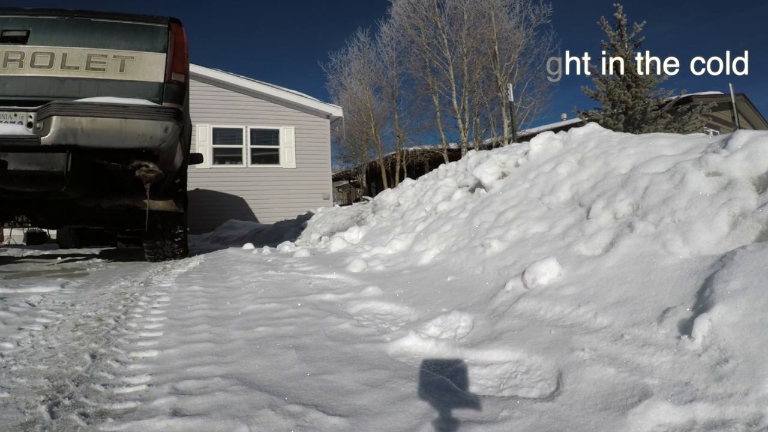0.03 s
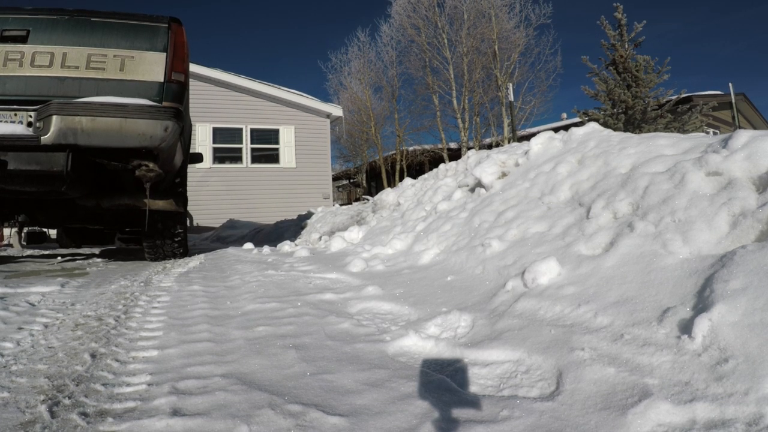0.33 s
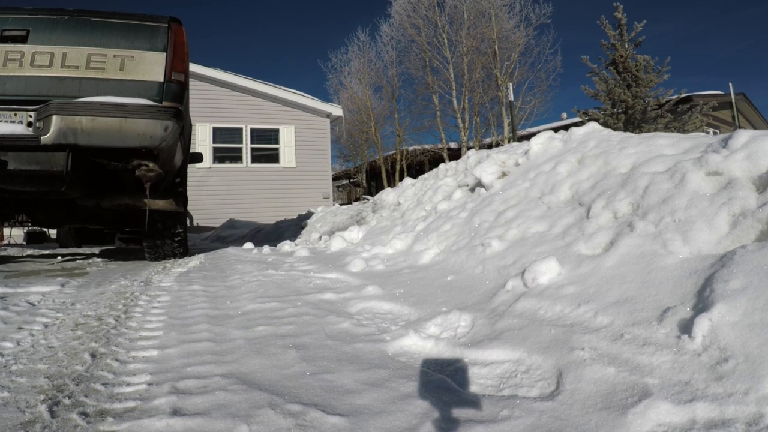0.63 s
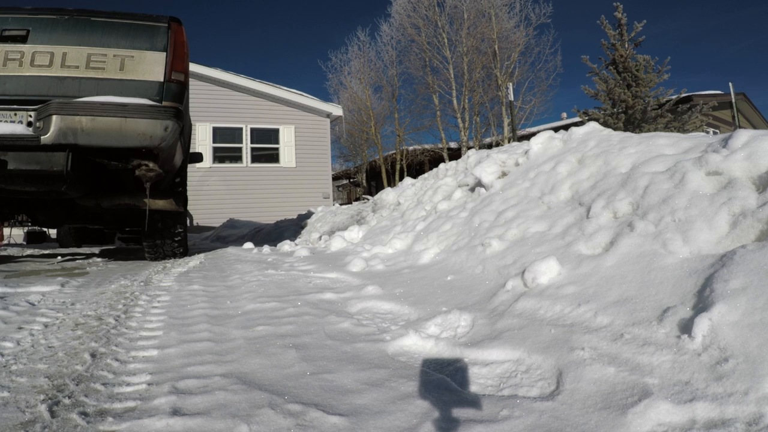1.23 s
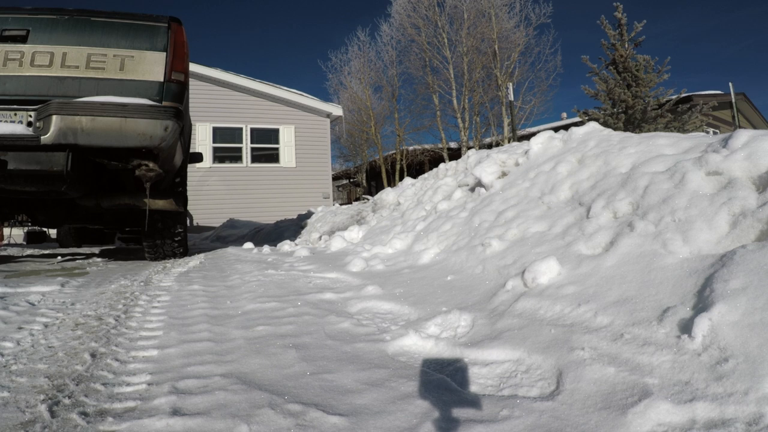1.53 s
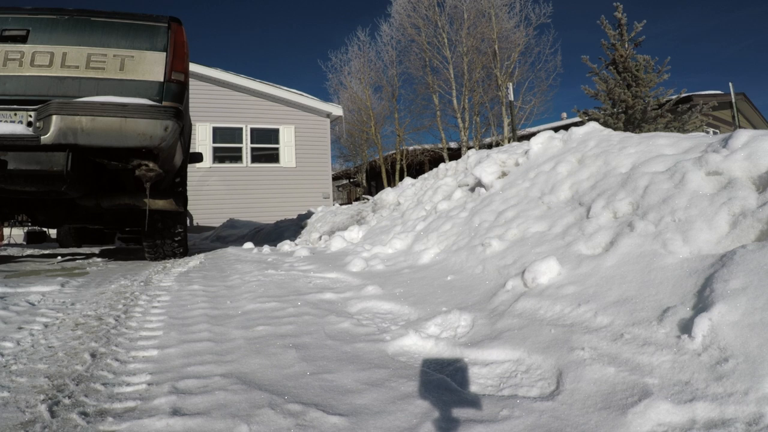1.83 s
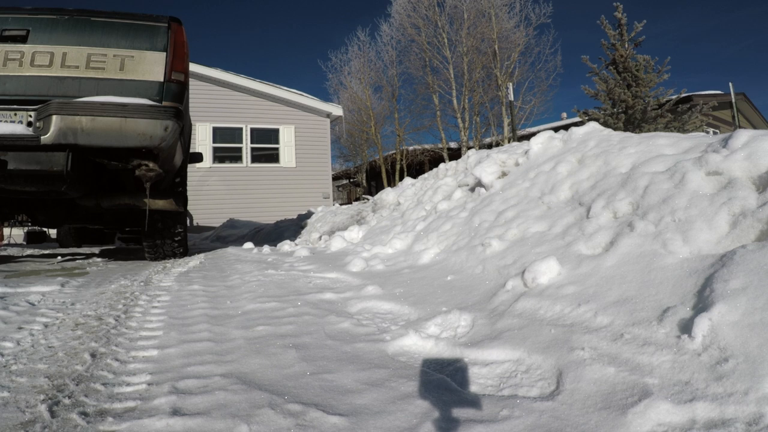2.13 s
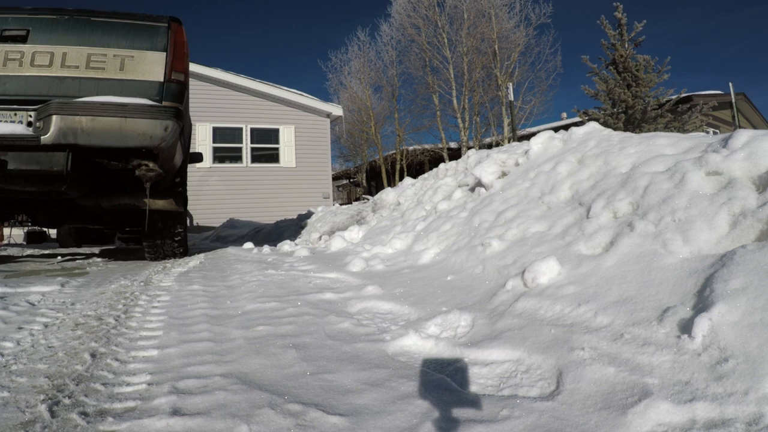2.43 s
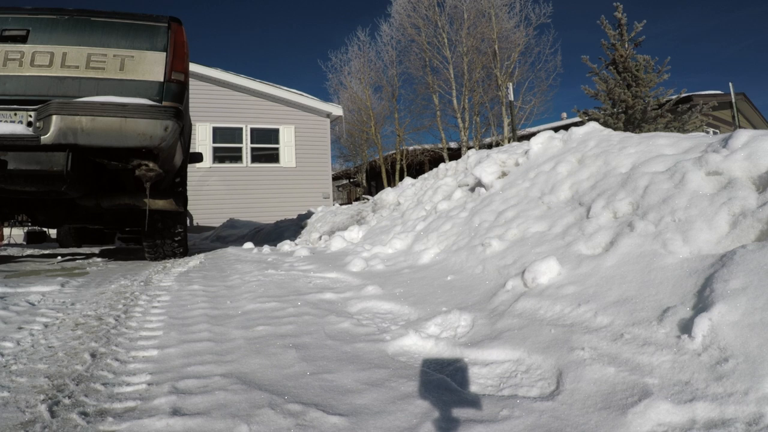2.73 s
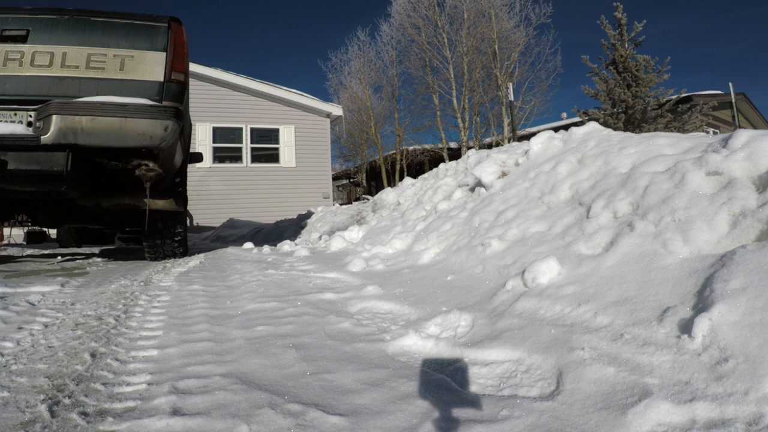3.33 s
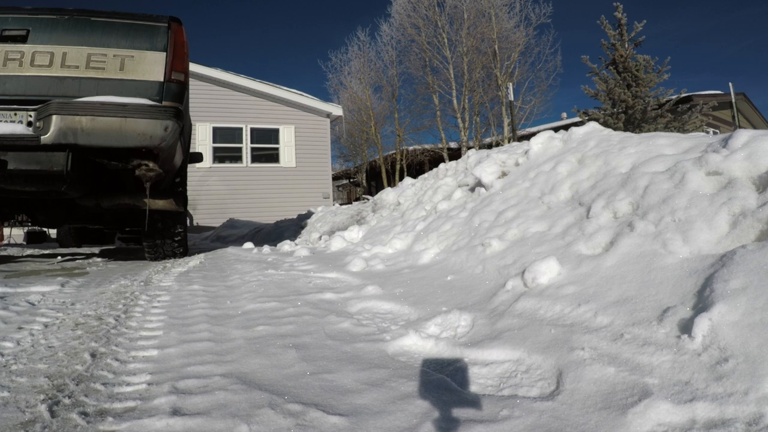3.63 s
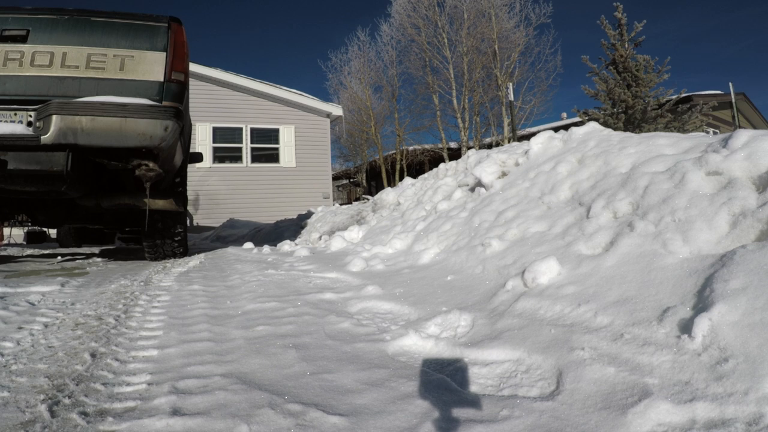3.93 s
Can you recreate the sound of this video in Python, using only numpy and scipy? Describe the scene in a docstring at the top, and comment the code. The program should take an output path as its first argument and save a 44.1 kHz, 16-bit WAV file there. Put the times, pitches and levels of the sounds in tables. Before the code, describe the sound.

A cold diesel truck cranks a few metres to the left outdoors. After a few microphone knocks and a quiet pause, the starter engages with a clank and squeak, whining and grinding in quickening pulses without the engine catching.

```python
"""A cold diesel pickup is cranked in a quiet, snowy driveway, a few metres from a small camera.
Over far rumble and steady hiss the camera is bumped; at 2 s comes one faint chink. At 2.86 s the solenoid
throws the starter pinion into the flywheel with a clash and a squeak. The gear whine sags and swells on
each compression stroke, and the unloaded gears rattle as the engine springs forward again.
Just before 4 s the engine gives one low thud."""
import sys
import numpy as np
from scipy import signal
from scipy.fft import rfft, irfft
from scipy.io import wavfile

SR = 44100
rng = np.random.default_rng(int(sys.argv[2]) if len(sys.argv) > 2 else 0)


def store_pcm(level_fs):
    """Save levels as 16-bit WAV."""
    pcm = np.round(np.clip(level_fs, -1, 1) * 32767).astype(np.int16)
    wavfile.write(sys.argv[1], SR, np.atleast_2d(pcm).T)


N = 176400


def amp(db):
    """Decibels to gain."""
    return 10 ** (np.asarray(db) / 20)


def unit(x):
    """Scale to rms 1."""
    return x / np.sqrt(np.mean(x ** 2))


def bins():
    """Bin frequencies in Hz, floored at 1."""
    return np.maximum(np.arange(N // 2 + 1) * SR / N, 1)


def curve(points):
    """Join (Hz, value) points on a log-frequency axis."""
    hz, value = np.array(points, float).T
    return np.interp(np.log(bins()), np.log(hz), value)


def shape(x, gain):
    """Filter by a gain per bin."""
    return irfft(rfft(x) * gain, N)


def ringing(peaks):
    """Response of a direct path plus resonances."""
    f = bins()
    return 1 + sum(amp(db) / (1 + 1j * (f * f - hz * hz) / (f * width)) for hz, width, db in peaks)


def ring_on(x, peaks):
    """Convolve with 0.25 s of resonant response."""
    return signal.fftconvolve(x, irfft(ringing(peaks), N)[:SR // 4])[:N]


def low_cut(x, hz=130):
    """Sixth-order high-pass."""
    return signal.sosfilt(signal.butter(6, hz, "high", fs=SR, output="sos"), x)


def noise(coherence):
    """Stereo noise with a left-right coherence per band."""
    c = np.clip(curve(coherence), -.99, .99)
    mid, side = shape(rng.standard_normal((2, N)), np.sqrt([1 + c, 1 - c]))
    return unit(np.array([mid + side, mid - side]))


def coloured(spectrum, coherence):
    """Shaped stereo noise, rms 1."""
    return unit(shape(noise(coherence), amp(curve(spectrum))))


def walk(rate_hz):
    """Smooth random wander, rms 1."""
    return unit(shape(rng.standard_normal(N), 1 / (1 + (bins() / rate_hz) ** 2) ** 2))


def burst(t, start_s, attack_s, decay_s):
    """Linear attack, exponential release."""
    age = t - start_s
    return np.clip(age / attack_s, 0, 1) * np.exp(-np.maximum(age - attack_s, 0) / decay_s)


def strike(t, start_s, modes, attack_s, pitch=1):
    """Decaying modes set off by one blow."""
    age = np.maximum(t - start_s, 0)
    ring = sum(amp(db - 60 * age / t60) * np.sin(2 * np.pi * hz * pitch * age) for hz, db, t60 in modes)
    return ring * np.clip(age / attack_s, 0, 1)


# background spectra (frequency [Hz], level [dB])
FAR_SPECTRUM = [(25, -48), (60, -25), (95, -96), (120, -19.5), (150, -5), (200, -0.5), (260, -7.5),
                (350, -8.5), (500, -13.5), (1000, -22), (5000, -42.5)]
HISS_SPECTRUM = [(300, -7), (1000, 3.5), (2000, 0.5), (3500, -3.5), (5500, -6), (7000, -2), (8200, -5.5),
                 (9800, -4), (11500, -12), (13000, -12), (15000, -71)]
# left-right likeness (frequency [Hz], coherence [ratio])
FAR_COHERENCE = [(100, 0.37), (250, 0.17), (600, 0.057), (1500, 0.039)]
HISS_COHERENCE = [(500, 0), (4000, 0)]
def outdoors(left_lag_s=0.00024):
    """Steady hiss; a far rumble from the right reaches the left port later."""
    delay = np.exp(-2j * np.pi * bins() * np.array([[left_lag_s], [0]]))
    far = shape(coloured(FAR_SPECTRUM, FAR_COHERENCE), delay)
    return amp(-40) * far + amp(-46) * coloured(HISS_SPECTRUM, HISS_COHERENCE)


# knocks on the camera (time [s], level [dB], tick level [dB], pitch [ratio])
KNOCKS = [(.025, -27.5, -75, 0.81), (0.137, -18, -60, 0.93), (.152, -20, -58, 1.07),
          (.167, -20, -34.5, 0.76), (.178, -21.5, -43, 1.2), (0.3947, -14, -29, 1.04),
          (.407, -17, -30.5, 0.94), (.425, -23, -38, 1.09), (0.684, -27.5, -75, 1.03),
          (0.699, -28, -75, 1.07)]
# camera and stand modes (frequency [Hz], level [dB], t60 [s])
MOUNT_MODES = [(170, -27, 0.037), (257, 4, 0.035), (385, -13, 0.019), (483, -11, 0.048)]
# case clicks (time [s], level [dB])
CASE_CLICKS = [(.13, -26), (.1675, -26.5), (.3949, -18.5)]
# stand shudders (time [s], level [dB], decay [s])
STAND_SHUDDERS = [(.16, -44, 0.033), (.395, -35, 0.066)]
# bump spectra (frequency [Hz], level [dB])
TICK_SPECTRUM = [(600, 2.5), (1500, -7.5), (4500, -12.5), (7000, -25), (15000, -34)]
SCUFF_SPECTRUM = [(200, -21), (400, -3), (570, 2), (800, -19), (5000, -47)]
SHUDDER_SPECTRUM = [(25, -3), (55, 2), (130, -13), (1000, -80)]
def camera_bumps(t):
    """Soft knocks with contact ticks and a scuff; the case clicks, the stand shudders."""
    knocks = sum(amp(db) * strike(t, s, MOUNT_MODES, .002, pitch) for s, db, _, pitch in KNOCKS)
    ticks = coloured(TICK_SPECTRUM, FAR_COHERENCE)
    ticks *= sum(amp(db) * burst(t, s, .0005, .006) for s, _, db, _ in KNOCKS)
    scuff = amp(-30) * coloured(SCUFF_SPECTRUM, FAR_COHERENCE) * burst(t, 0.117, 0.03, 0.022)
    clicks = sum(amp(db) * (t >= s) * np.exp(-np.abs(t - s) / 0.0006) for s, db in CASE_CLICKS)
    shudder = coloured(SHUDDER_SPECTRUM, FAR_COHERENCE)
    shudder *= sum(amp(db) * burst(t, s, 0.017, decay_s) for s, db, decay_s in STAND_SHUDDERS)
    return ticks + scuff + shudder - knocks - clicks


# chink spectrum (frequency [Hz], level [dB])
CHINK_SPECTRUM = [(3000, -29), (3950, -1), (5200, -10), (9000, -32)]
def chink(t, start_s=2.007):
    """One faint, high chink."""
    return amp(-39) * coloured(CHINK_SPECTRUM, HISS_COHERENCE) * burst(t, start_s, .003, 0.023)


# solenoid and pinion blows (time [s], clash level [dB], thud level [dB], clash decay [s])
PINION_BLOWS = [(2.858, -36.5, -35, 0.085), (2.885, -24.5, -34, 0.028), (2.904, -28, -13, 0.016)]
# metal clash spectrum (frequency [Hz], level [dB])
CLASH_SPECTRUM = [(300, 4), (800, -6), (1300, 1.5), (1700, -6.5), (2600, 0), (3500, -7), (4400, -1.5),
                  (5600, -5.5), (7500, -13), (14000, -44)]
# starter housing resonances (frequency [Hz], width [Hz], level [dB])
HOUSING_PEAKS = [(995, 14, 12), (1117, 9.7, -5), (1642, 20, 4.5), (1814, 15, 6.5), (2065, 28, 3),
                 (2667, 12, 5.5), (2904, 25, 4.5)]
# bell housing and solenoid plunger modes (frequency [Hz], level [dB], t60 [s])
BELL_MODES = [(148.7, -7.5, 0.42), (276, -5.5, 0.11), (400, -3, 0.093), (468, -8.5, 0.17), (737, -6, 0.1),
              (1217, -18.5, 0.12), (2110, -21, 0.11)]
PLUNGER_MODES = [(2670, -40.5, 0.55), (2934, -37, .35)]
# left-right likeness of the truck's noises (frequency [Hz], coherence [ratio])
TRUCK_COHERENCE = [(130, .9), (290, .9), (640, .7), (1400, .8), (3100, .85), (5000, .85), (9000, .5)]
def engage(t):
    """The solenoid throws the pinion against the ring gear: a clash and thud with the deep bass cut."""
    metal = unit(shape(noise(TRUCK_COHERENCE), amp(curve(CLASH_SPECTRUM)) * ringing(HOUSING_PEAKS)))
    clashes = metal * sum(amp(db) * burst(t, s, .002, decay_s) for s, db, _, decay_s in PINION_BLOWS)
    thuds = sum(amp(db) * strike(t, s, BELL_MODES, attack_s=.005) for s, _, db, _ in PINION_BLOWS)
    plunger = strike(t, PINION_BLOWS[0][0], PLUNGER_MODES, attack_s=1 / SR)
    return low_cut(clashes + thuds + plunger)


# pinion squeaks (time [s], level [dB])
PINION_SQUEAKS = [(2.896, -29.5), (3.81, -37), (3.937, -28.5)]
# pinion resonances (frequency [Hz], width [Hz], level [dB])
PINION_PEAKS = [(4285, 45, -1.5), (4700, 60, -2), (5310, 68, -1.5)]
def squeaks(t):
    """The slipping pinion rings in short squeaks."""
    ring = unit(shape(noise(TRUCK_COHERENCE), ringing(PINION_PEAKS) - 1))
    return ring * sum(amp(db) * burst(t, s, 0.01, 0.013) for s, db in PINION_SQUEAKS)


CRANK_START_S, START_TOOTH_HZ, SPIN_UP_S = 2.905, 206.85, 0.015
# compression strokes (fastest time [s], tooth rate [Hz], slowest time [s], tooth rate [Hz],
# whine level [dB], grind level [dB])
COMPRESSIONS = [(3.012, 246.2, 3.168, 170.9, -7.5, -5), (3.226, 249.7, 3.33, 168.2, -6.5, -4.5),
                (3.388, 271.4, 3.485, 205.8, -3, -4), (3.555, 279.8, 3.638, 211.5, -1.5, -2.5),
                (3.695, 282.6, 3.788, 191.2, 2, -1.5), (3.858, 285.8, 3.93, 220.2, -1.5, -1.5),
                (3.98, 281, 4.06, 212.7, -2, -1)]
def crank(t):
    """Tooth rate and gear loads: each compression slows the starter and loads its gears."""
    times, rates_hz = [CRANK_START_S], [START_TOOTH_HZ]
    whine_load = grind_load = 0
    for fast_s, fast_hz, slow_s, slow_hz, whine_db, grind_db in COMPRESSIONS:
        times += [fast_s, slow_s]
        rates_hz += [fast_hz, slow_hz]
        progress = (t - fast_s) / (slow_s - fast_s)
        whine_load += amp(whine_db) * np.exp(-((progress - 0.49) / 0.55) ** 4)
        grind_load += amp(grind_db) * np.exp(-((progress - .5) / 0.69) ** 2)
    knots = np.arange(len(times))
    leg = np.interp(t, times, knots)
    eased = np.floor(leg) + (1 - np.cos(np.pi * (leg % 1))) / 2
    return np.interp(eased, knots, rates_hz), whine_load, grind_load


# first two tooth harmonics (level [dB])
LOW_HARMONICS_DB = [1.5, -4]
# spectrum of the higher harmonics (frequency [Hz], level [dB])
OVERTONE_SPECTRUM = [(700, 4), (1000, -7), (2800, -15), (4500, -19)]
# engine block resonances (frequency [Hz], width [Hz], level [dB])
BLOCK_PEAKS = [(219, 19, 6.5), (276, 21, 7.5), (361, 26.3, 13), (477, 22, 5), (560, 46, 1.5)]
def gear_whine(teeth, low_load, high_load, harmonics=14):
    """Uneven teeth give rough harmonics: the lowest boom in the block, the rest ring the housing."""
    force = 1 + .4 * walk(160)
    partials = [force * (1 + .3 * walk(38)) * np.sin(2 * np.pi * k * teeth + .3 * walk(60))
                for k in range(1, harmonics + 1)]
    low = low_cut(sum(amp(db) * partial for db, partial in zip(LOW_HARMONICS_DB, partials)))
    high = shape(sum(partials[len(LOW_HARMONICS_DB):]), amp(curve(OVERTONE_SPECTRUM)))
    block = amp(-32) * ring_on(low * low_load, BLOCK_PEAKS)
    return block + amp(-30) * ring_on(high * high_load, HOUSING_PEAKS)


def scrape(contact, spectrum):
    """Noise pulsed by tooth contact rings the housing; rms 1."""
    return unit(shape(noise(TRUCK_COHERENCE) * contact, amp(curve(spectrum)) * ringing(HOUSING_PEAKS)))


# gear grind spectrum (frequency [Hz], level [dB])
GRIND_SPECTRUM = [(100, -43), (160, -2), (300, -14), (550, 0.5), (800, -2), (1300, -5.5), (2200, -7.5),
                  (3200, -11.5), (6000, -27), (14000, -54)]
def gear_grind(contact, load):
    """Meshing teeth grind harder under load."""
    return amp(-32) * scrape(contact, GRIND_SPECTRUM) * (0.24 + load)


# engine rumble spectrum (frequency [Hz], level [dB])
RUMBLE_SPECTRUM = [(100, -52), (125, -21), (150, 0), (220, -2), (320, -12), (550, -7), (800, -22.5),
                   (4000, -57)]
def engine_rumble(load):
    """The turning engine rumbles, louder on each compression."""
    return amp(-32.5) * coloured(RUMBLE_SPECTRUM, TRUCK_COHERENCE) * (.55 + load)


# rattles as the load lets go (time [s], level [dB], attack [s])
RELEASES = [(2.985, -9.5, 0.049), (3.17, -7.5, 0.068), (3.32, -6, 0.05), (3.527, -12, 0.0088),
            (3.671, -6, 0.01), (3.804, -1, .014), (3.927, -1.5, 0.014)]
# gear rattle spectrum (frequency [Hz], level [dB])
RATTLE_SPECTRUM = [(400, -10), (1000, -23), (1700, -3), (2900, 1), (5200, 0), (6500, -6.5), (9000, -21),
                   (14000, -49)]
def gear_rattle(t, contact, decay_s=0.081):
    """The teeth rattle most when unloaded."""
    free = sum(amp(db) * burst(t, s, attack_s, decay_s) for s, db, attack_s in RELEASES)
    return amp(-33.5 + 0.92 * walk(23)) * scrape(contact, RATTLE_SPECTRUM) * (0.45 + free)


def starter(t, jitter=.012, scatter_db=.6, decay_teeth=1.8):
    """The starter turns the engine; its teeth go slack just before each rattle and the noise dips."""
    tooth_hz, whine_load, grind_load = crank(t)
    teeth = np.cumsum(tooth_hz * (1 + jitter * walk(70))) / SR
    running = np.clip((t - CRANK_START_S) / SPIN_UP_S, 0, 1)
    whine = gear_whine(teeth, running * (0.32 + whine_load), running * grind_load ** 2)
    tooth_gains = amp(scatter_db * rng.standard_normal(N))
    contact = np.exp(-(teeth % 1) / decay_teeth) * tooth_gains[teeth.astype(int)]
    noises = gear_grind(contact, grind_load) + gear_rattle(t, contact) + engine_rumble(grind_load)
    slack = sum(np.exp(-((t - s + .011) / .015) ** 2) for s, *_ in RELEASES)
    return whine + running * noises * (1 - .45 * slack)


# engine thud spectrum (frequency [Hz], level [dB])
THUD_SPECTRUM = [(70, -25), (150, -2), (330, -5), (600, -25), (2000, -55)]
def engine_thud(t, start_s=3.968):
    """One heavier, low thud on the last stroke."""
    return amp(-22.5) * coloured(THUD_SPECTRUM, TRUCK_COHERENCE) * burst(t, start_s, 0.018, 0.095)


# truck at the microphone (frequency [Hz], left minus right [dB], left lead [rad])
PORT_DIFFERENCES = [(255, 0, 0.053), (553, -2.5, 0.24), (756, -3, 0.97), (1000, 5, 1.5), (1760, 9.5, 0.73),
                    (2230, 14, 2.9), (2700, 10, 7.2), (3730, 3.5, 6.63), (6320, -1, 9.02)]
def from_left(truck):
    """The truck stands to the left and reaches the right microphone port later."""
    pan_db = curve([(hz, db) for hz, db, _ in PORT_DIFFERENCES])
    lead_rad = curve([(hz, rad) for hz, _, rad in PORT_DIFFERENCES])
    ports = irfft(np.array([amp(pan_db / 2), amp(-pan_db / 2) * np.exp(-1j * lead_rad)]), N)
    centred_taps = np.roll(ports, 256, axis=1)[:, :513]
    return signal.fftconvolve(truck, centred_taps, mode="same", axes=1)


def scene():
    """Background, camera bumps, chink and truck in stereo."""
    t = np.arange(N) / SR
    truck = starter(t) + engage(t) + squeaks(t) + engine_thud(t)
    return outdoors() + camera_bumps(t) + chink(t) + from_left(truck)


def record(dry):
    """The camera cuts the treble above 15 kHz."""
    return signal.sosfilt(signal.ellip(8, .2, 70, 15000, fs=SR, output="sos"), dry)


dry = scene()
out = record(dry)
store_pcm(out)
```